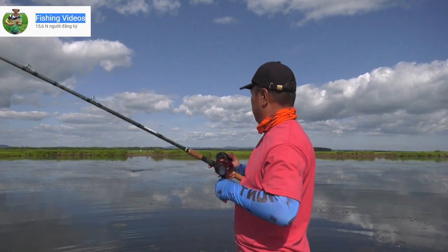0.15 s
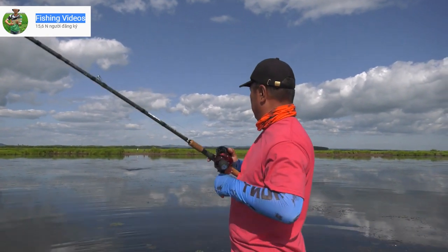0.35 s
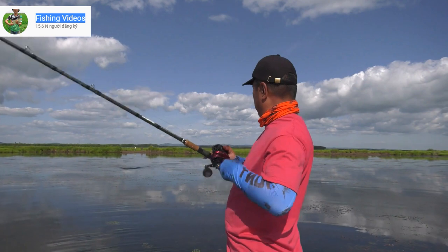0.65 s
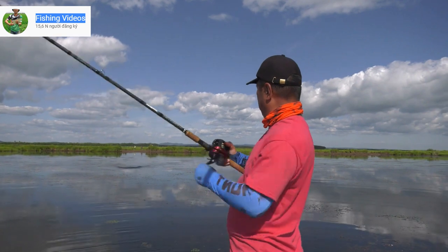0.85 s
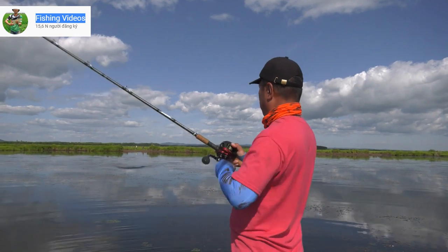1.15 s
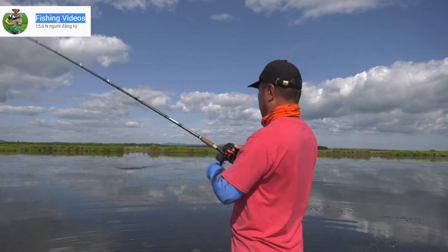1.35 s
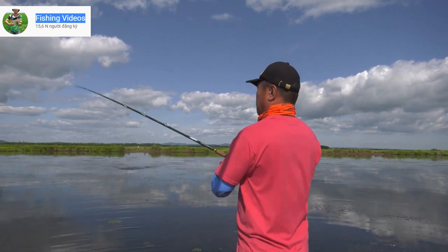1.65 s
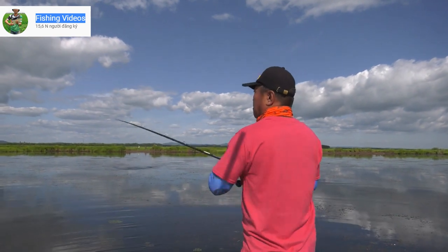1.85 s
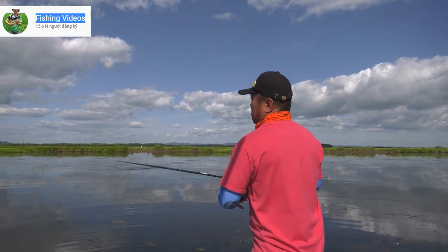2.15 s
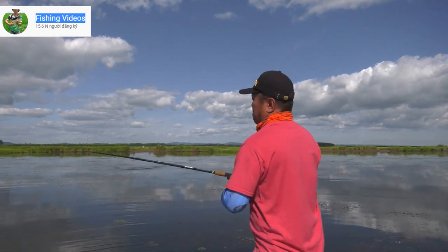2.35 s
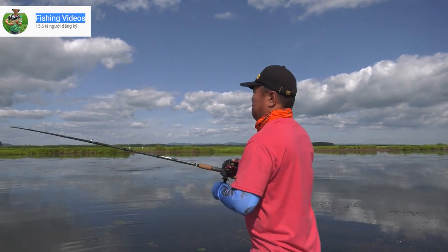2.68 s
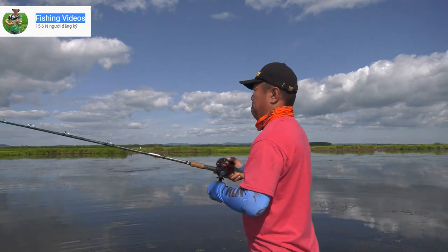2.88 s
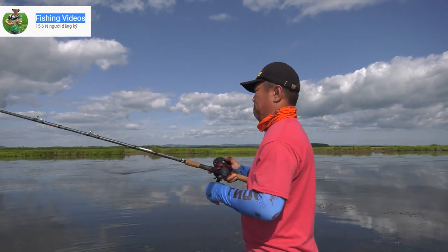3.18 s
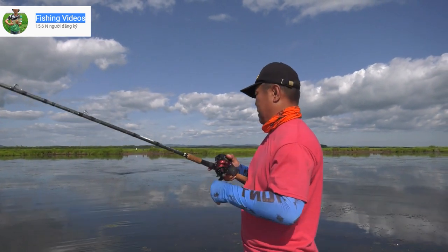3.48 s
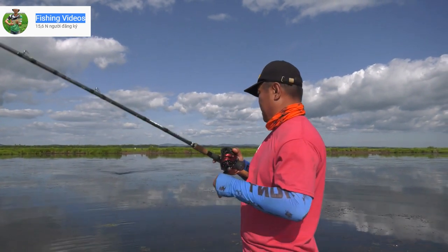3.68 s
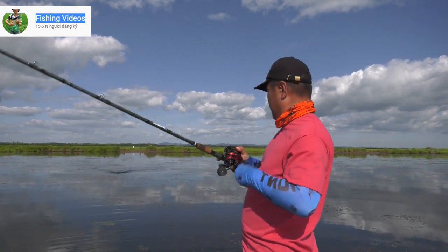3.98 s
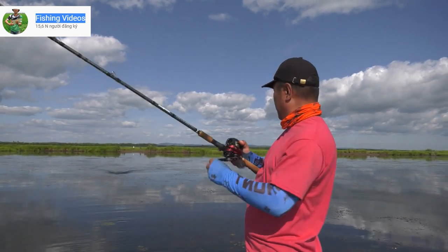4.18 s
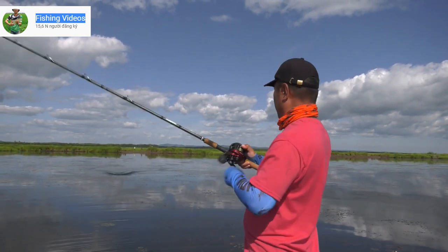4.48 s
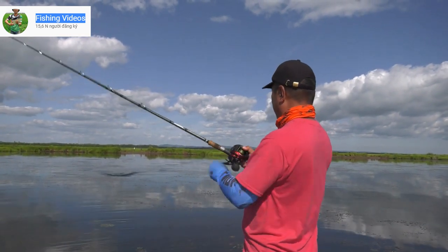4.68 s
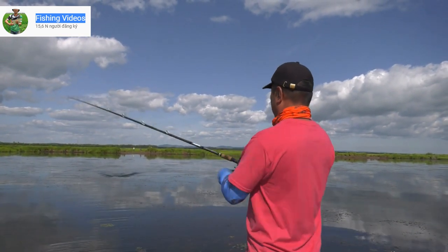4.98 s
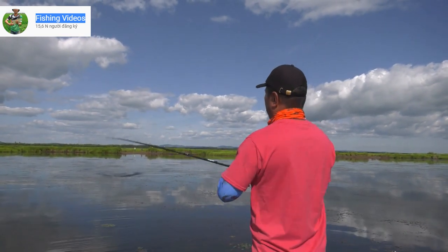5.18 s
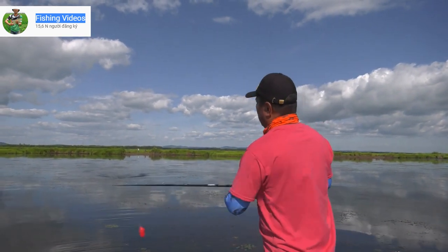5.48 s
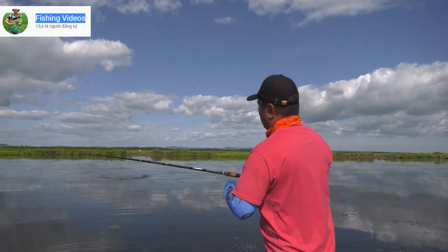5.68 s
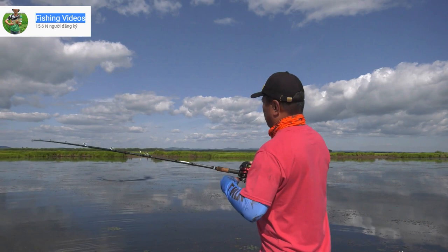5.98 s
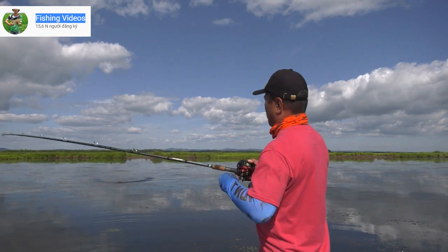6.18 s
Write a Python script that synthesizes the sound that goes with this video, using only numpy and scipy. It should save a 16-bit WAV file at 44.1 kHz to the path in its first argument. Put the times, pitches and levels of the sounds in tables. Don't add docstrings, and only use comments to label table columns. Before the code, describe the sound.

A close, dry outdoor sound on calm water, with low wind puffs and faint hiss beneath. From 0.1 to 0.6 s, dull hollow knocks cluster unevenly over rough rubbing, strongest around 0.4 and 0.55. From about 0.85 to 1.7 s a reel is cranked in quick grainy throbs, roughly eight a second, with bright metallic ticks, line hiss and solid knocks near 1.16 and 1.5. A stuttering slide at 2.1 and a lone knock at 2.3 lead into near quiet with tiny creaks. Soft taps return at 3.1, chattering evenly from 3.36 to 3.5, then a bright clack at 3.7. Reeling resumes from 3.9 to 5.1, whirring and hissing with sharp ticks around 4.25, and fades. A juddering slide at 5.5 precedes the hardest blow at 5.82, a short woody bang with a quick bounce, followed by small clicks and faint rubbing until about 6.4.

```python
import sys
import numpy as np
from scipy import signal
from scipy.fft import rfft, irfft, next_fast_len
from scipy.io import wavfile
from scipy.ndimage import uniform_filter1d

SR = 44100
rng = np.random.default_rng(int(sys.argv[2]) if len(sys.argv) > 2 else 0)


def to_wav(sig):
    pcm = np.clip(np.atleast_2d(sig), -1, 1) * 32767
    pcm = np.round(pcm).astype(np.int16)
    wavfile.write(sys.argv[1], SR, pcm.T)


def attenuation_scalar(level_db):
    decades = np.asarray(level_db, float) / 20
    return 10 ** decades


N = 279594

# frequency in Hz, level in dB per Hz.
AIR_COLOUR = [(15, -74), (25, -29), (141, -5), (333, -5), (371, -2), (691, -5.5), (812, -3), (1550, -15),
              (4690, -26.5), (15800, -28)]
# frequency in Hz, side over mid in dB.
AIR_WIDTH = [(60, -6), (110, -11), (200, -6), (380, -6.5), (700, -8), (1290, -1.5), (2380, 5), (4400, 7),
             (8120, 0.5), (15000, 4)]
# middle in seconds, hold in seconds, level in dB.
GUSTS = [
    (.1, .1, -73),
    (.65, 0.22, -71.5),
    (1.0, .1, -77),
    (1.45, 0.32, -74),
    (1.95, 0.38, -78),
    (3.55, .2, -78),
    (5.38, .1, -75),
    (5.85, .1, -75),
    (6.1, .1, -84),
]

# frequency in Hz, level in dB, 60 dB decay in seconds.
BODY_MODES = [(141.5, 3.5, 0.077), (257, -16.5, 0.069), (681, 10.5, 0.027), (881, 8.5, 0.017),
              (1080, 10, 0.012), (1526, 5.5, 0.011), (2122, -11, 0.055), (1450, -7.5, 0.035),
              (2680, 1, 0.01)]
# start in seconds, peak in dB, ring in Hz, overtones in dB over the ring.
FIRST_KNOCKS = [(0.068, -46, 323, -8), (0.145, -44, 386, -6), (0.185, -38.5, 335, -6.5),
                (0.223, -44, 302, -9), (0.267, -31, 325, -13), (0.298, -35, 246, -9),
                (0.382, -34.5, 300, -12), (0.393, -29.5, 373, -9), (0.448, -42, 357, -9.5),
                (0.546, -28, 288, -19), (0.559, -36, 253, -23), (0.593, -31.5, 333, -33),
                (1.169, -36, 275, -15), (1.519, -33.5, 230, -25), (0.801, -38.5, 354, -15.5),
                (1.069, -40.5, 297, -29), (1.157, -26.5, 283, -14), (1.159, -32, 378, -18),
                (1.312, -40, 370, -24), (1.507, -28.5, 437, -33), (1.53, -37, 246, -35),
                (1.766, -47, 315, -12), (2.093, -47, 299, -10), (2.292, -38.5, 291, -7.5)]
# start in seconds, peak in dB, ring in Hz, overtones in dB over the ring.
SECOND_KNOCKS = [(3.127, -41.5, 333, -28), (3.174, -45, 360, -10), (3.203, -42, 343, -10),
                 (3.272, -41, 320, -10), (3.616, -41.5, 342, -20), (3.717, -58, 390, 8),
                 (3.934, -38, 306, -10.5), (4.17, -34.5, 376, -17.5), (5.16, -44, 330, -11.5),
                 (4.003, -51.5, 483, -15), (5.629, -48, 330, -22), (5.703, -45.5, 302, -16)]
# start in seconds, peak in dB, ring in Hz, overtones in dB over the ring.
CHATTER = [
    (3.361, -37, 298, -6),
    (3.401, -35.5, 312, -6),
    (3.426, -35.5, 315, -7),
    (3.461, -36.5, 330, -4.5),
    (3.512, -36, 312, -7.5),
]
# start in seconds, peak in dB, ring in Hz, ring length in ms.
LOOSE_KNOCKS = [
    (0.975, -40.5, 288, 26),
    (1.512, -40, 185, 18),
]
# start in seconds, peak in dB.
LONE_SLIPS = [(0.198, -40), (0.209, -49), (0.237, -39.5), (0.252, -48), (0.319, -47), (0.331, -46),
              (0.419, -37), (0.457, -45), (0.474, -42), (0.485, -42.5), (0.603, -40), (1.105, -47),
              (1.117, -46), (1.135, -42), (1.195, -49), (1.228, -45), (1.429, -44), (1.453, -51),
              (1.484, -52), (1.555, -50), (1.645, -50), (1.66, -49), (1.814, -46), (1.859, -49),
              (2.304, -44), (3.157, -48), (3.668, -52), (3.952, -54), (5.679, -52)]
# start in seconds, peak in dB.
STUTTERS = [(2.109, -42), (2.12, -37), (2.139, -42), (2.145, -39.5), (2.164, -46), (2.179, -45.5),
            (2.203, -57), (5.451, -51), (5.467, -47), (5.485, -51), (5.493, -47), (5.512, -44),
            (5.527, -41.5), (5.546, -49), (5.558, -41), (5.578, -44), (5.596, -53), (5.602, -47)]
# start in seconds, thump in dB.
THUMPS = [(0.269, -46), (0.546, -41), (0.594, -49.5), (1.331, -60), (1.507, -37), (1.53, -57), (1.775, -50),
          (1.85, -51), (3.19, -50.5), (3.362, -48), (3.402, -49), (3.427, -52), (3.462, -48),
          (3.513, -49.5), (3.617, -54.5), (5.704, -51), (4.17, -59), (3.934, -46.5), (5.159, -52)]
# frequency in Hz, 60 dB decay in seconds.
HULL_DECAY = [(100, 0.28), (300, 0.067), (1000, 0.076), (4000, 0.033), (12000, 0.056)]

# centre in Hz, length in ms, then its hits as start in seconds, peak in dB.
CLACKS = [
    (1210, 2.6, [(0.393, -48), (0.6005, -54), (1.508, -44), (2.2944, -53), (3.7174, -30), (3.9345, -44), (1.157, -36), (2.5282, -48.5), (5.7673, -50)]),
    (2160, 2.7, [(0.3955, -39), (3.3605, -51), (3.4015, -53), (3.427, -57), (3.4612, -57), (3.5115, -54), (1.2296, -42.5), (1.4835, -38), (4.3096, -31), (4.8394, -40), (5.676, -51), (6.19, -40)]),
    (2950, 2.1, [(0.2987, -30.5), (0.5445, -52), (0.9198, -37), (0.9722, -31.5), (1.1997, -31.5), (4.2662, -43), (4.3395, -41)]),
    (3800, 2, [(0.075, -48), (0.6022, -41)]),
]
# centre in Hz, length in ms, then its hits as start in seconds, peak in dB.
RATTLES = [
    (4700, 3, [(0.2979, -33.5), (0.5496, -42.5), (0.9428, -31.5), (1.5082, -29), (0.9712, -32), (1.4835, -39), (4.3085, -38), (4.8168, -45), (4.4875, -38), (5.676, -49.5), (2.2937, -47), (3.961, -37), (4.792, -36.5), (5.823, -30), (5.8354, -39), (6.0222, -47.5), (6.1749, -40.5), (6.19, -39.5)]),
    (6150, 0.75, [(0.9715, -30), (1.5152, -40), (4.0194, -48), (4.121, -44), (4.2358, -29.5), (4.2595, -27.5), (4.2924, -34), (4.487, -44), (4.6104, -39)]),
    (7500, 1.7, [(0.33, -45), (0.815, -41.5), (1.3304, -48), (3.3794, -48), (0.9427, -36), (1.0116, -43), (4.2045, -48), (4.9405, -45), (1.508, -40), (1.5556, -41), (3.3134, -48), (3.726, -42), (4.5421, -37), (4.57, -39), (4.8165, -33)]),
    (10230, 1.4, [(0.9708, -27), (1.3922, -41), (1.4137, -36.5), (4.308, -26.5), (4.5166, -45)]),
    (10900, 1.2, [(0.9426, -38), (1.3084, -44), (1.3304, -42), (1.4805, -45), (4.2358, -38), (4.2595, -32), (4.57, -44)]),
]

# frequency in Hz, width in Hz, level in dB.
RUB_MODES = [(155, 75, -8), (255, 96, -3.5), (354, 132, -4.5), (532, 80, -5.5), (723, 250, -7),
             (837, 180, -14.5), (1180, 370, -17.5)]
# middle in seconds, hold in seconds, pressure in dB.
DRAGS = [(0.27, 0.14, -51), (0.47, 0.066, -57), (0.734, .02, -53.5), (1.0, 0.25, -58), (1.22, 0.045, -54.5),
         (1.42, 0.061, -61.5), (1.6, .05, -61), (1.865, 0.14, -54.5), (2.13, 0.12, -53.5), (2.55, .1, -65),
         (3.17, 0.11, -61), (3.394, .01, -65), (3.47, 0.18, -56), (3.97, 0.037, -70), (4.17, 0.082, -59.5),
         (4.45, 0.44, -61.5), (5.2, 0.19, -61.5), (5.543, 0.037, -55), (5.72, 0.033, -72),
         (6.25, 0.29, -62.5)]
# middle in seconds, hold in seconds, level in dB.
SHUDDERS = [
    (0.42, 0.05, -48),
    (0.575, 0.034, -49),
    (0.615, 0.023, -50.5),
    (1.178, 0.026, -56),
    (1.53, 0.033, -47.5),
    (2.315, 0.017, -53.5),
    (3.735, 0.017, -56),
    (5.845, 0.03, -52),
]

# middle in seconds, hold in seconds, effort in dB.
STROKES = [(0.72, 0.23, -56.5), (0.905, 0.056, -50), (1.043, 0.035, -45), (1.17, 0.048, -47.5),
           (1.25, .04, -54), (1.315, 0.044, -50.5), (1.425, 0.076, -49), (1.545, 0.12, -50.5),
           (1.69, 0.067, -53.5), (1.79, 0.17, -60.5), (1.9, 0.05, -57), (2.02, 0.085, -62.5),
           (3.735, 0.022, -58), (3.81, .07, -74), (3.945, 0.037, -55), (4.05, 0.11, -58), (4.155, .1, -54),
           (4.255, 0.058, -48), (4.4, 0.056, -50), (4.525, 0.074, -48.5), (4.66, 0.046, -48.5),
           (4.78, 0.085, -52), (4.93, 0.072, -51), (5.07, 0.05, -52.5), (5.29, 0.047, -58),
           (5.39, .03, -63.5), (6.26, 0.12, -65)]
# frequency in Hz, level in dB per Hz.
GEAR_COLOUR = [(290, -43), (500, -8), (841, 1), (949, -4.5), (1190, 3), (1380, -8), (2160, -0.5),
               (3030, -0.5), (3340, -1.5), (4740, 0.5), (9000, -11), (11700, -57), (19800, -120)]
# frequency in Hz, width in Hz, level in dB.
FRAME_MODES = [(1575, 400, -12.5), (2320, 820, -8), (2925, 270, -9), (3670, 360, -10.5), (4380, 180, -13.5),
               (4750, 380, -17.5), (6400, 170, -17), (7800, 350, -20), (10030, 400, -18.5)]
# middle in seconds, hold in seconds, hiss in dB.
RETRIEVES = [
    (1.2, 0.52, -65),
    (2.8, 0.22, -84),
    (4.3, 0.87, -61),
]
# frequency in Hz, level in dB per Hz.
LINE_COLOUR = [(2940, -21.5), (5000, -7), (6900, -10.5), (7490, -7), (8290, -9.5), (8820, -10),
               (11800, -12), (15800, -20)]
# start in seconds, length in seconds, centre in Hz, level in dB.
RUSTLES = [
    (0.6, 0.39, 7500, -71.5),
    (3.283, 0.13, 7500, -82),
    (3.47, 0.23, 6000, -67),
    (3.698, 0.04, 5000, -54.5),
    (3.699, 0.073, 1300, -56.5),
    (3.77, 0.11, 7500, -69),
    (3.78, 0.092, 12500, -70),
    (2.55, .2, 6000, -74),
    (2.87, 0.24, 7500, -79),
]
# start in seconds, frequency in Hz, level in dB.
CHIRRS = [(0.881, 3090, -53), (1.0, 4530, -57.5), (1.006, 2094, -51.5), (1.008, 1182, -54.5),
          (1.315, 4580, -56), (1.382, 4750, -53), (1.553, 4530, -52), (1.552, 2190, -56.5),
          (1.62, 4660, -63.5), (1.66, 2580, -61), (3.9, 4500, -64), (4.37, 2660, -59), (4.65, 3650, -64),
          (5.05, 2580, -66), (5.365, 1265, -65), (4.233, 3020, -54), (4.465, 4700, -58), (4.48, 2460, -58),
          (4.52, 2950, -54), (4.625, 4750, -50.5), (4.644, 2480, -61), (4.89, 2300, -60),
          (4.905, 2750, -58), (1.285, 1080, -68), (1.415, 1104, -61), (1.03, 1660, -62), (1.035, 3100, -59),
          (4.06, 2870, -68), (4.13, 7700, -64), (4.11, 1800, -61), (4.21, 3630, -61), (4.53, 2210, -63),
          (4.66, 3600, -66), (4.92, 3630, -63), (5.26, 1400, -63.5), (5.28, 2800, -74)]
# start in seconds, length in seconds, frequency in Hz, level in dB.
HUMS = [
    (2.45, 0.61, 4880, -78),
    (2.85, .3, 7370, -84),
    (3.28, 0.54, 9400, -89),
    (4.732, 0.12, 4670, -54),
    (4.84, 0.13, 4780, -61),
    (5.673, 0.49, 5000, -73.5),
]
# start in seconds, peak in dB, centre in Hz.
CATCHES = [(0.874, -44, 4700), (0.8966, -36.5, 3070), (0.914, -40, 6200), (1.0127, -46, 4800),
           (1.0174, -42, 2210), (1.158, -33, 3300), (1.385, -43, 4770), (1.487, -41, 3500),
           (1.49, -43, 2200), (4.207, -44, 6000), (4.249, -39, 3100), (4.268, -36, 3000),
           (4.285, -44, 5000), (4.406, -45, 8500), (4.5175, -37, 5000), (4.611, -39, 3500),
           (4.669, -39, 5000), (4.677, -41, 2500), (4.813, -40, 2800), (4.94, -39, 3800),
           (4.967, -49, 9000)]

# start in seconds, frequency in Hz, level in dB, 60 dB decay in seconds.
AFTER_RINGS = [(1.158, 643, -41, .05), (1.158, 995, -33, 0.039), (1.158, 1560, -34.5, .04),
               (1.158, 1760, -40, .04), (1.172, 271, -39, 0.16), (1.335, 139.5, -51.5, .4),
               (1.515, 440, -40, .11), (1.518, 604, -44, .12), (1.533, 290, -37.5, 0.09),
               (2.293, 700, -47, 0.046), (4.171, 387, -42, 0.052), (5.826, 2100, -41, .06),
               (5.826, 511, -42, .08), (5.83, 1240, -51, .2), (5.83, 1795, -55, 0.28),
               (5.83, 800, -50, .14), (5.835, 324, -52, .2)]
# start in seconds, peak in dB, centre in Hz.
CREAKS = [(2.488, -58, 2500), (2.638, -51, 3200), (2.799, -54, 4600), (2.915, -58, 8500),
          (2.941, -55, 3500), (2.965, -55, 5200), (3.083, -55, 3090), (3.112, -57, 3140),
          (3.151, -53, 4200), (3.214, -52, 3420), (3.287, -57, 6500), (3.303, -52, 2670),
          (3.303, -55, 7800), (3.315, -51, 3000), (3.337, -55, 2620), (3.338, -54, 7800), (3.36, -51, 7000),
          (3.38, -45, 3000), (3.424, -52, 7500), (3.443, -51, 6000), (3.484, -51, 2900), (3.486, -53, 6000),
          (3.561, -46, 5900), (3.577, -54, 7000), (3.592, -54, 6500), (3.611, -54, 6500),
          (3.641, -54, 6500), (3.746, -53, 8500), (3.753, -52, 6000), (3.757, -51, 9500),
          (3.768, -53, 4500), (5.196, -54, 2530), (1.99, -50, 1770), (2.047, -54, 2000)]
# frequency in Hz, level in dB, 60 dB decay in seconds.
PLANK_MODES = [(105, -18.5, 0.16), (302, -8, 0.036), (390, -0.5, 0.02), (676, -3, 0.028), (846, 1, 0.039),
               (1170, 3.5, 0.017), (1330, 0, 0.017), (1560, -1.5, 0.032), (2070, -9, 0.031),
               (477, 2, 0.033), (5184, -12, 0.036), (375, -27, .1), (1780, -16, 0.048)]

# frequency in Hz, level in dB.
NEAR_MID = [(25, -16), (60, -13), (130, 3), (10000, -3), (12000, -9), (16000, -6)]
# frequency in Hz, side level in dB.
NEAR_SIDE = [(60, -18), (200, -27), (700, -21), (1400, -14), (3000, -16), (6800, -19), (9000, -10.5),
             (11000, 1.5), (15000, -8)]


def evened(x):
    return x / np.sqrt(np.mean(x ** 2) + 1e-20)


def read(points, hz):
    f, value = np.transpose(points)
    return np.interp(np.log(hz + 1), np.log(f + 1), value)


def curves(rows, rise_db_s, fall_db_s, rest_db):
    t = np.arange(0, N + 64, 64)[:, None] / SR
    middle, hold, db = np.transpose(rows)
    early = np.maximum(middle - hold / 2 - t, 0)
    late = np.maximum(t - middle - hold / 2, 0)
    gestures = attenuation_scalar(db - rise_db_s * early - fall_db_s * late) ** 2
    power = gestures.sum(axis=1) + attenuation_scalar(rest_db) ** 2
    return np.interp(np.arange(N) / SR, t[:, 0], 10 * np.log10(power))


def colour(x, points, turn=1):
    size = next_fast_len(N)
    gain = attenuation_scalar(read(points, np.fft.rfftfreq(size, 1 / SR)))
    return irfft(rfft(x, size) * turn * gain, size)[..., :N]


def add(mix, s, sound):
    part = mix[round(s * SR):][:len(sound)]
    part += sound[:len(part)]


def resonate(x, hz, width):
    turn = np.exp(2j * np.pi * np.cumsum(hz * np.ones(len(x))) / SR)
    r = np.exp(-np.pi * width / SR)
    smooth = signal.lfilter([1 - r], [1, -r], x / turn + 1e-18)
    return 2 * (turn * smooth).real


def ring(x, hz, width):
    return evened(resonate(resonate(x, hz, width), hz, width))


def grit(per_s, spread_db):
    size = attenuation_scalar(spread_db * np.minimum(rng.exponential(1, N), 4)) * rng.choice([-1., 1.], N)
    return evened(size * (rng.random(N) < per_s / SR))


def drift(ms):
    length = int(ms * SR / 1000)
    return evened(uniform_filter1d(uniform_filter1d(rng.standard_normal(N), length), length))


def air():
    mid, side = colour(rng.standard_normal((2, N)), AIR_COLOUR)
    scale = attenuation_scalar(-59 - 4.5 + 1.2 * drift(55)) / np.std(mid)
    wind_db = curves(GUSTS, 60, 60, -86.5) + 2.5 * drift(60)
    wind = attenuation_scalar(wind_db) * ring(rng.standard_normal(N), 81, 62)
    return scale * mid + wind, scale * colour(side, AIR_WIDTH) + 0.24 * wind[::-1]


def gripped(t):
    return -6 * ((t > 3.0) & (t < 3.7))


def blows():
    rows = [(s, db, hz, 7.7, over_db) for s, db, hz, over_db in FIRST_KNOCKS]
    rows += [(s, db, hz, 9, over_db) for s, db, hz, over_db in SECOND_KNOCKS]
    rows += [(s, db, hz, 11.8, over_db) for s, db, hz, over_db in CHATTER]
    rows += [(s, db, hz, ms, -20) for s, db, hz, ms in LOOSE_KNOCKS]
    tune = 330 * (1 + 0.31 * (rng.random((2, 60)) - .5))
    rows += [(s, db, hz, 5.6, -14) for (s, db), hz in zip(LONE_SLIPS, tune[0])]
    rows += [(s, db, hz, 6.5, -16) for (s, db), hz in zip(STUTTERS, tune[1])]
    return rows


def knocks():
    t = np.arange(SR // 13) / SR
    out = np.zeros(N)
    for s, db, hz, ms, over_db in blows():
        rise_s = .0011 * attenuation_scalar(0.52 * np.clip(-12.5 - over_db, 0, 18))
        rise = 1 - np.exp(-t / rise_s)
        sound = np.sin(2 * np.pi * hz * t) * np.exp(-(t * 1000 / ms) ** 4)
        for f, level_db, decay in BODY_MODES:
            if f < 200:
                lift_db = -28
            elif f > 500:
                lift_db = over_db
                decay = decay * attenuation_scalar(gripped(s))
            else:
                lift_db = gripped(s)
            mode_db = lift_db + level_db + 8 * (rng.random() - .5)
            detune = 1 + (rng.random() - .5) / 10
            sound += attenuation_scalar(mode_db - 60 * t / decay) * np.sin(2 * np.pi * f * detune * t)
        crack = ring(rng.standard_normal(len(t)), 2100, 5500) * attenuation_scalar(over_db - 11.5 - 60 * t / 0.1)
        add(out, s, attenuation_scalar(db) * (rise * sound + crack))
    f, level_db, decay = BODY_MODES[0]
    rise = 1 - np.exp(-t / 0.0036)
    for s, db in THUMPS:
        detune = 1 + (rng.random() - .5) / 10
        thump = np.sin(2 * np.pi * f * detune * t)
        add(out, s, rise * attenuation_scalar(db + level_db - 60 * t / decay) * thump)
    return out


def hull(x):
    size = SR // 2
    taps = rng.choice([-1., 1.], size) * (rng.random(size) < .05) * (np.arange(size) > 250)
    hz, t, z = signal.stft(taps, SR, nperseg=256)
    tail = signal.istft(z * attenuation_scalar(-60 * t / read(HULL_DECAY, hz)[:, None]), SR, nperseg=256)[1]
    return signal.fftconvolve(x, tail / np.linalg.norm(tail))[:N]


def ticks(parts):
    t = np.arange(900) / SR
    out = np.zeros(N)
    for hz, ms, rows in parts:
        width = min(0.79 * hz, 3700)
        for s, db in rows:
            swell = 1 - np.exp(-t * 1000 / (0.7 * ms))
            burst = rng.standard_normal(len(t)) * np.exp(-t * 1000 / ms) * swell
            burst[12] += .45
            sound = resonate(resonate(burst, hz, width), hz, width)
            sound += 0.068 * resonate(resonate(burst, 4000, 10000), 4000, 10000)
            add(out, s, attenuation_scalar(db) * sound / abs(sound).max())
    return out


def clacks_and_rattles():
    return ticks(CLACKS + RATTLES)


def rub():
    turns = np.cumsum(62 * (1 + .3 * drift(12)) / SR)
    slips = np.diff(np.floor(turns), prepend=0) * attenuation_scalar(3.6 * rng.standard_normal(N))
    drive = 0.47 * evened(slips) + 1.06 * grit(700, 3.1)
    body = np.zeros(N)
    for k, (hz, width, db) in enumerate(RUB_MODES):
        body += (-1) ** k * attenuation_scalar(db) * ring(drive, hz, width * 1.97)
    drag = attenuation_scalar(curves(DRAGS, 199, 184, -64.5))
    shudder = attenuation_scalar(curves(SHUDDERS, 1500, 256, -90))
    return np.hypot(drag, shudder) * attenuation_scalar(-3.5) * evened(body)


def flares(teeth):
    out, patchy = np.zeros(N), drift(19)
    rows = [(s, 0.056, hz, db, .15, 1.8, 520) for s, hz, db in CHIRRS]
    rows += [(*row, .12, 2.5, 1100) for row in HUMS]
    rows += [(*row, .7, 1.5, 9000) for row in RUSTLES]
    for s, length, hz, db, width, patchy_db, widest in rows:
        span = slice(round(s * SR), round((s + length) * SR))
        part = teeth[span]
        glide = 1 + 0.019 * np.sin(np.linspace(0, 4, len(part)) + 7 * hz)
        sound = ring(part, hz * glide, min(width * hz, widest))
        level = attenuation_scalar(db + patchy_db * patchy[span])
        add(out, s, level * sound * signal.windows.tukey(len(part), .6))
    return out


def reel():
    teeth = grit(5000, 2.7)
    frame = attenuation_scalar(-2) * evened(colour(teeth, GEAR_COLOUR))
    grip = 1 + 0.029 * drift(32)
    for hz, width, db in FRAME_MODES:
        frame += attenuation_scalar(db - 8.0 + 3.3 * drift(21)) * ring(teeth, hz * grip, width * 1.34)
    effort_db = curves(STROKES, 349, 436, -69.5)
    stroke_db = effort_db - uniform_filter1d(effort_db, 9000)
    line_db = curves(RETRIEVES, 19, 40, -75)
    hiss = attenuation_scalar(line_db + 0.72 * stroke_db) * evened(colour(grit(7000, 2.3), LINE_COLOUR))
    whirr = attenuation_scalar(effort_db - 1.0) * frame
    return attenuation_scalar(1.3 * drift(9.3)) * (whirr + hiss) + flares(teeth)


def catches():
    return ticks([(hz, 0.71, [(s, db)]) for s, db, hz in CATCHES])


def after_rings():
    t = np.arange(6000) / SR
    out = np.zeros(N)
    fade = (1 - np.exp(-t / 0.0012)) * np.cos(np.pi / 2 * t / t[-1])
    for s, hz, db, t60 in AFTER_RINGS:
        add(out, s, attenuation_scalar(db - 60 * t / t60) * fade * np.sin(2 * np.pi * hz * t))
    return out


def creaks():
    return ticks([(hz, 1.7, [(s, db)]) for s, db, hz in CREAKS])


def bang():
    start_s, level_db = 5.8208, -22
    t = np.arange(12000) / SR
    out = np.zeros(N)
    plank = sum(attenuation_scalar(db - 60 * t / t60) * np.sin(2 * np.pi * hz * t) for hz, db, t60 in PLANK_MODES)
    shudder = attenuation_scalar(-20.5 - 60 * t / 0.16) * ring(rng.standard_normal(len(t)), 800, 2500)
    crack = attenuation_scalar(-22.5 - 60 * t / 0.078) * rng.standard_normal(len(t))
    sound = (plank + shudder + crack) * (1 - np.exp(-t / 0.00049))
    add(out, start_s, attenuation_scalar(level_db) * sound)
    add(out, start_s + .0028, attenuation_scalar(level_db - 4.0) * sound)
    return out


def scene():
    mid, side = air()
    hits = knocks() + clacks_and_rattles() + after_rings() + creaks() + bang()
    hits = signal.sosfilt(signal.butter(2, 90, "high", fs=SR, output="sos"), hits)
    echo = attenuation_scalar(-14) * hull(hits * attenuation_scalar(gripped(np.arange(N) / SR)))
    near = hits + echo + rub() + reel() + catches()
    angle = 1.75 + .4 * drift(58)
    side = side + np.cos(angle) * colour(near, NEAR_SIDE)
    side = side + np.sin(angle) * colour(near, NEAR_SIDE, turn=1j)
    mid = mid + colour(near, NEAR_MID)
    return np.array([mid + side, mid - side]) * attenuation_scalar([[.25], [-.25]])


def low_pass(x):
    return signal.sosfilt(signal.butter(12, 16430, fs=SR, output="sos"), x)


def record(dry):
    band_limit = signal.firwin(511, 15780, window=("kaiser", 9), fs=SR)
    limited = signal.oaconvolve(dry, band_limit[None], "same")
    return low_pass(limited)


dry = scene()
out = record(dry)
to_wav(out)
```